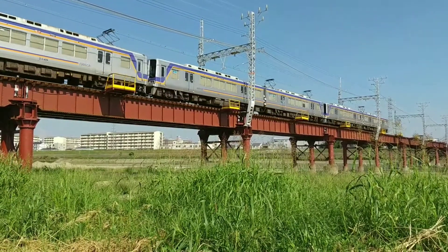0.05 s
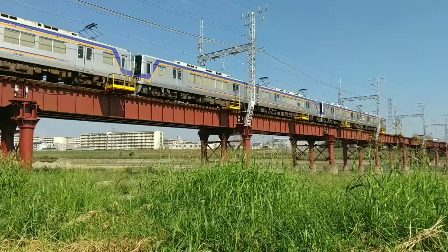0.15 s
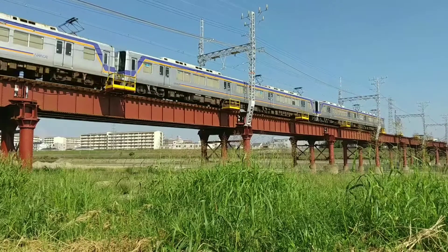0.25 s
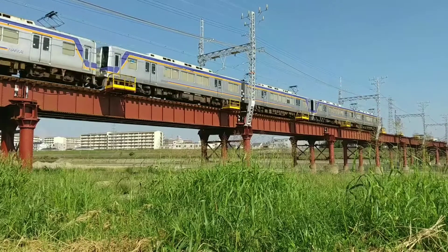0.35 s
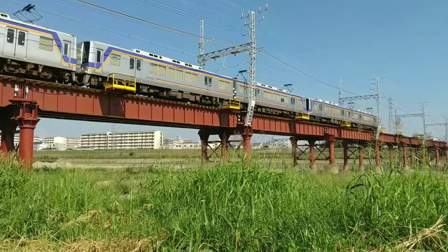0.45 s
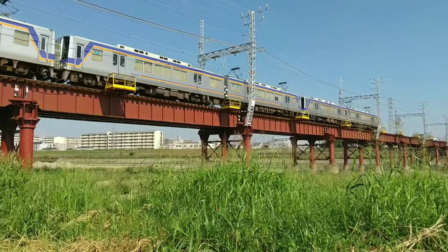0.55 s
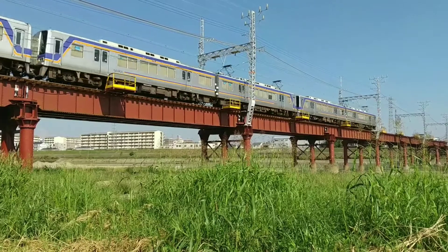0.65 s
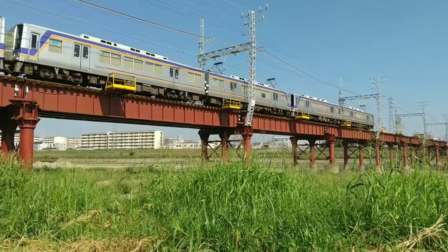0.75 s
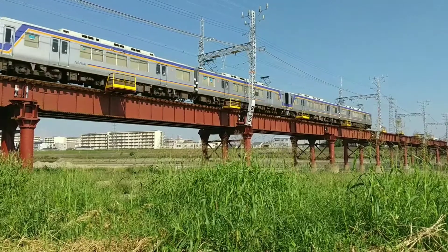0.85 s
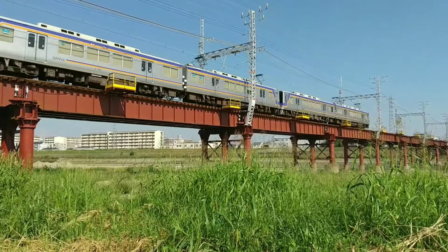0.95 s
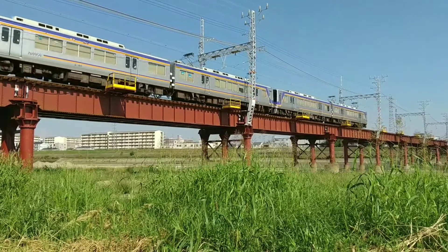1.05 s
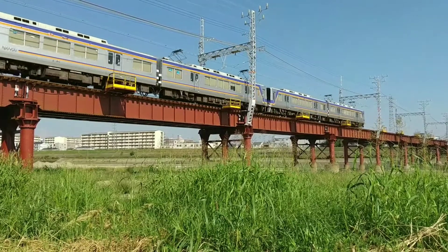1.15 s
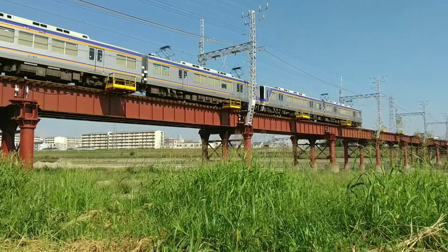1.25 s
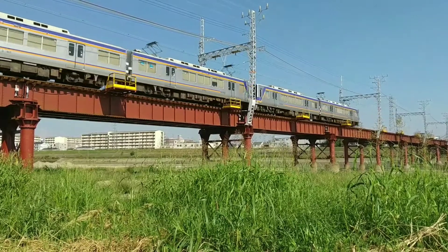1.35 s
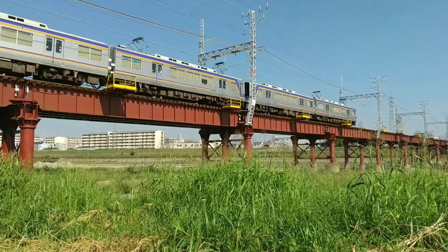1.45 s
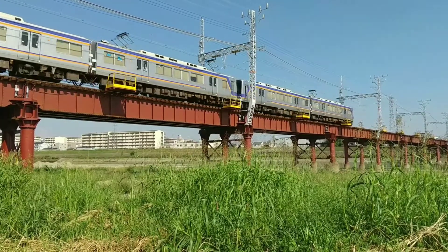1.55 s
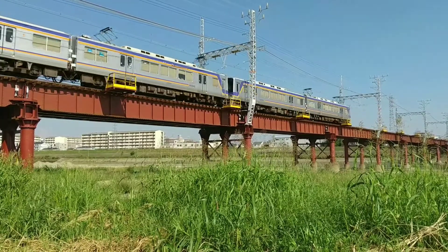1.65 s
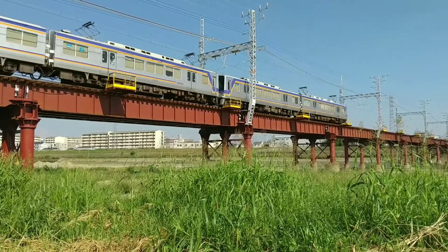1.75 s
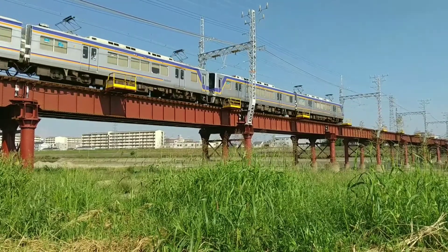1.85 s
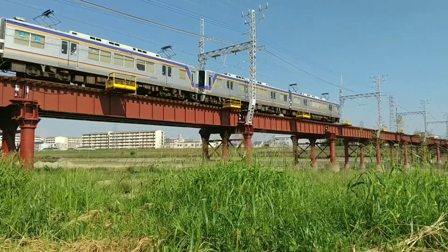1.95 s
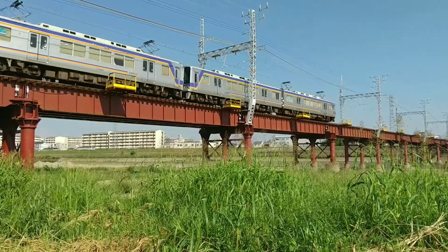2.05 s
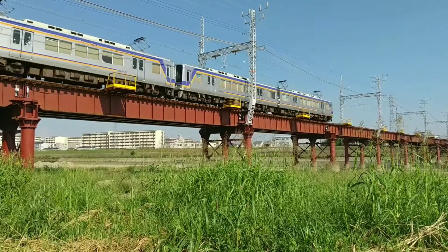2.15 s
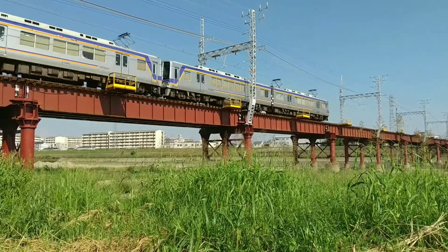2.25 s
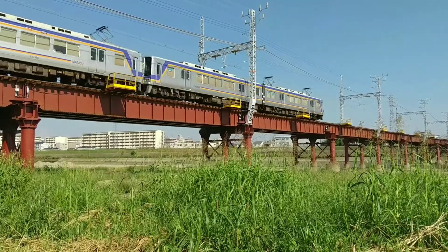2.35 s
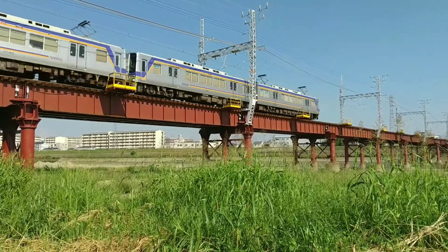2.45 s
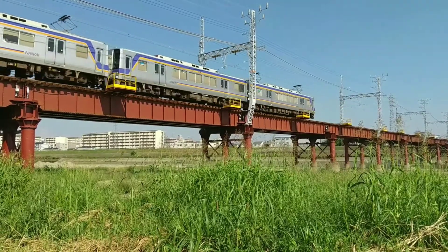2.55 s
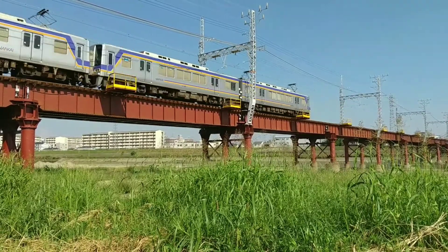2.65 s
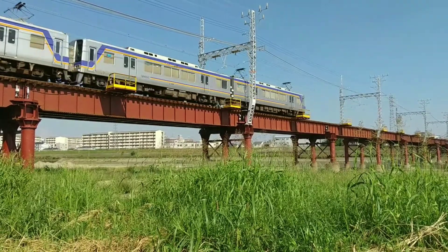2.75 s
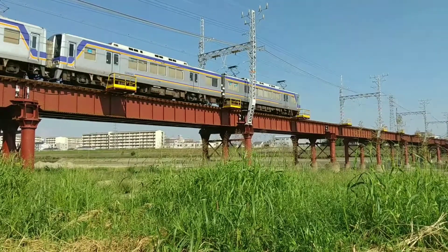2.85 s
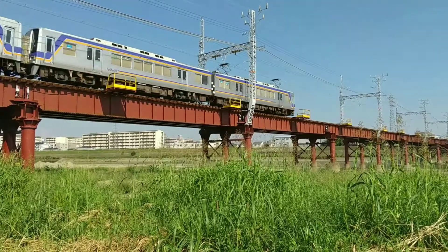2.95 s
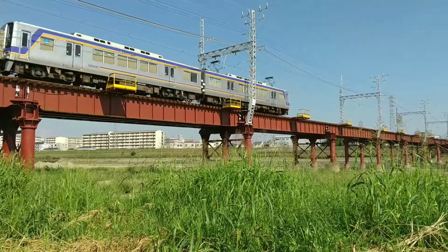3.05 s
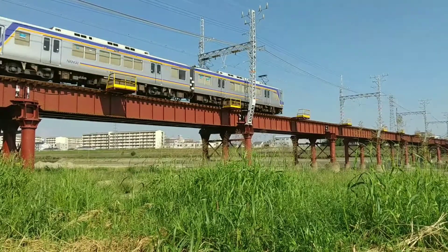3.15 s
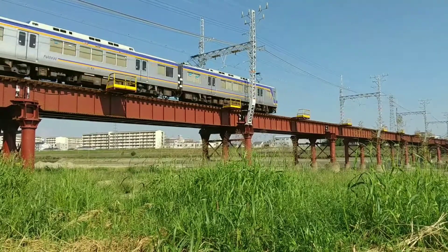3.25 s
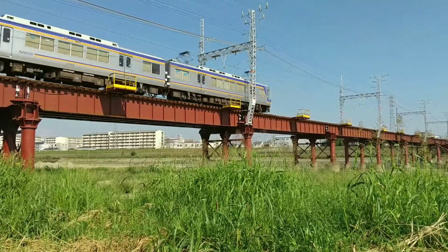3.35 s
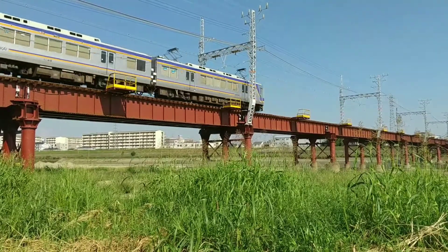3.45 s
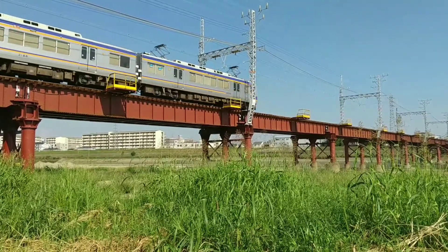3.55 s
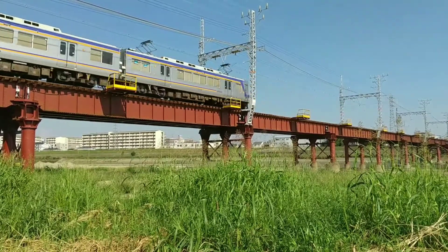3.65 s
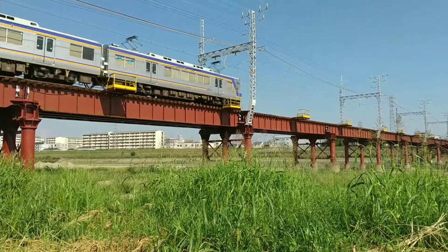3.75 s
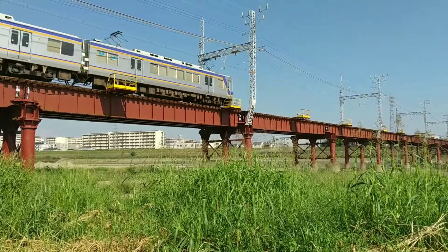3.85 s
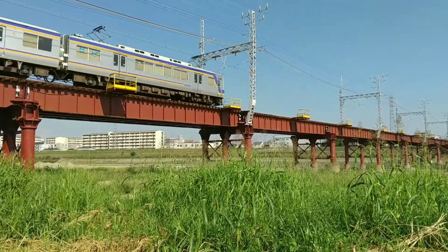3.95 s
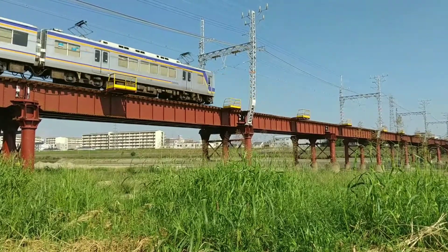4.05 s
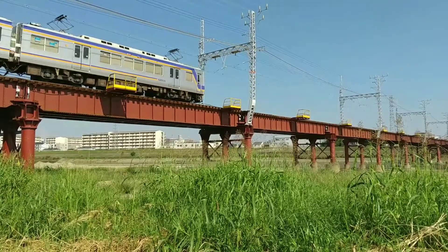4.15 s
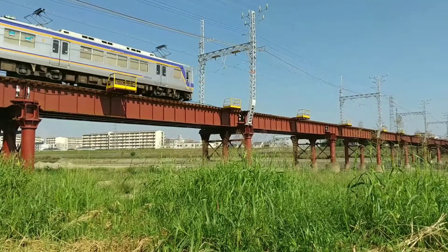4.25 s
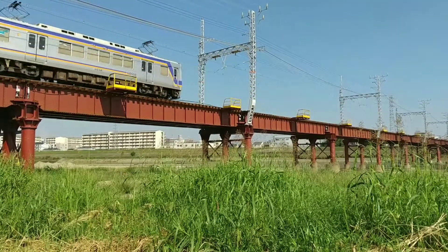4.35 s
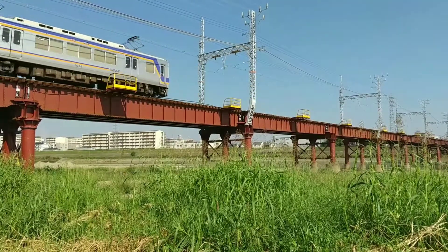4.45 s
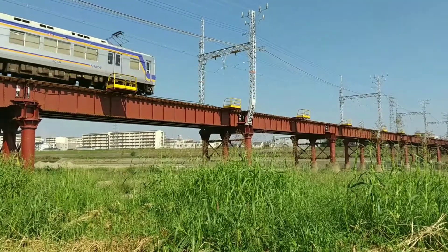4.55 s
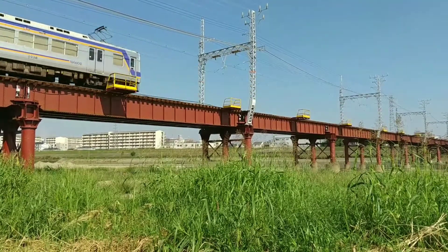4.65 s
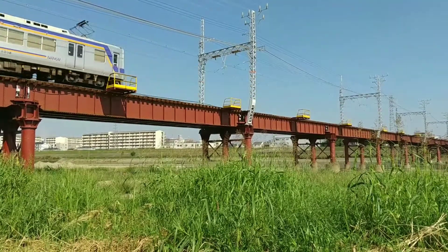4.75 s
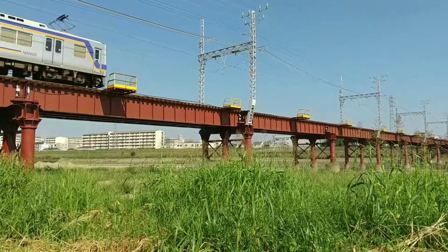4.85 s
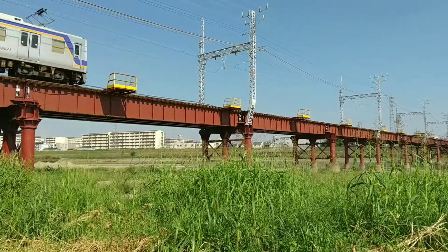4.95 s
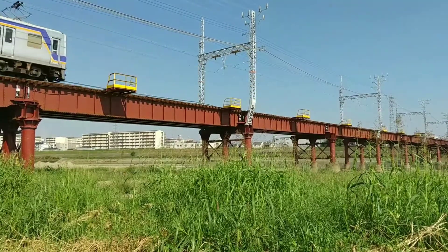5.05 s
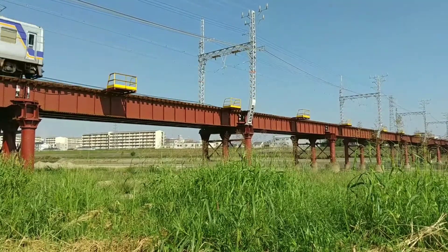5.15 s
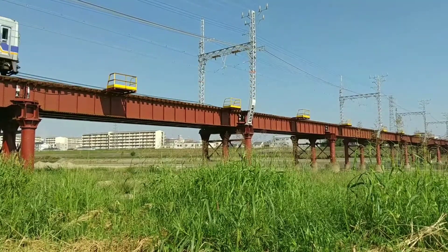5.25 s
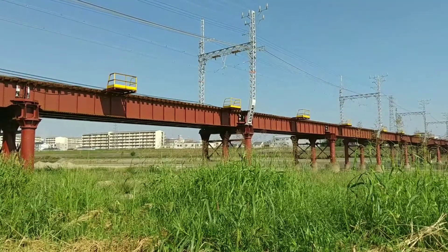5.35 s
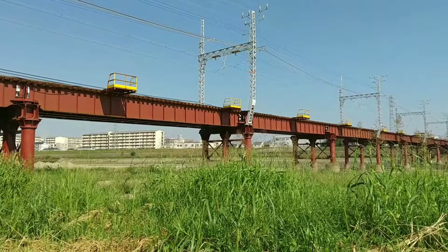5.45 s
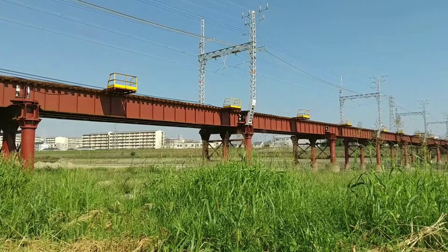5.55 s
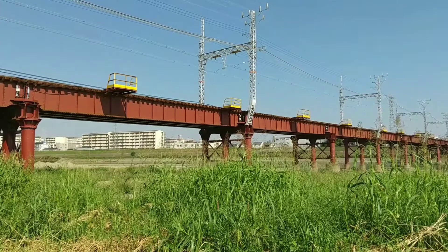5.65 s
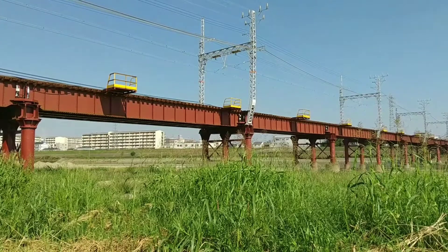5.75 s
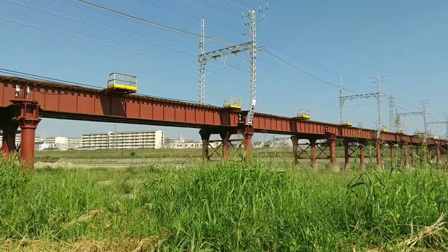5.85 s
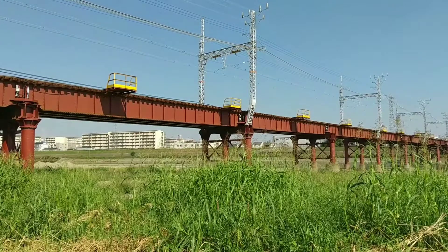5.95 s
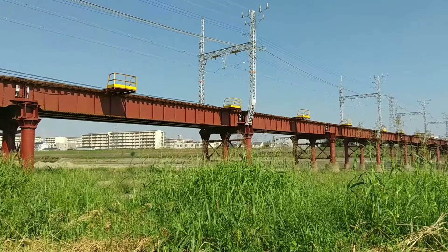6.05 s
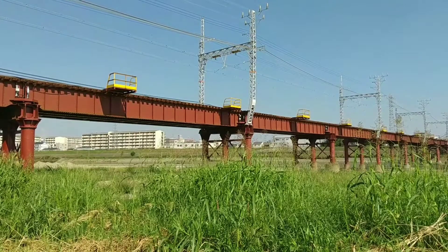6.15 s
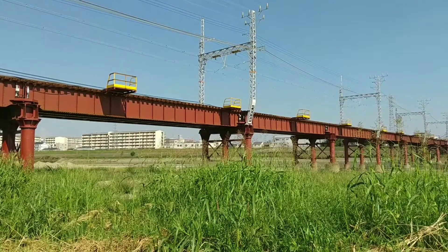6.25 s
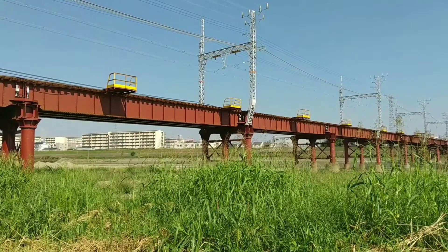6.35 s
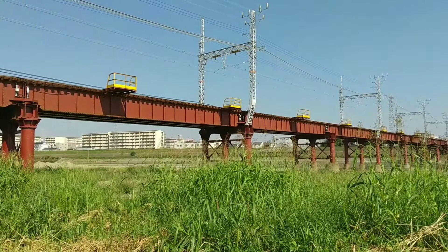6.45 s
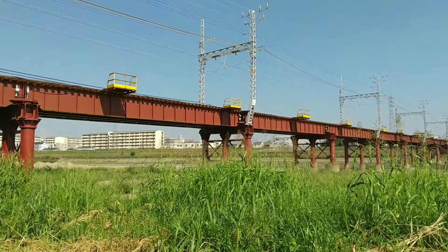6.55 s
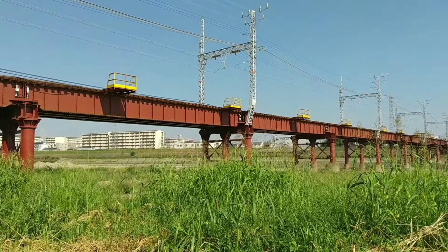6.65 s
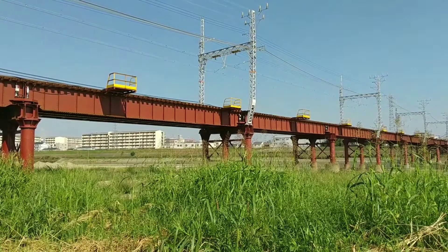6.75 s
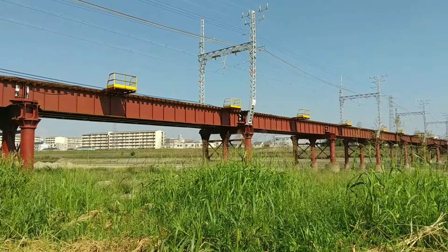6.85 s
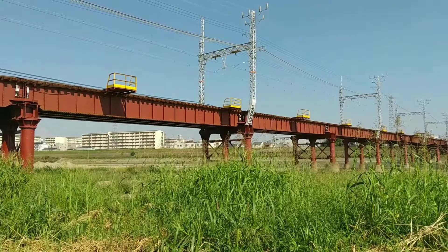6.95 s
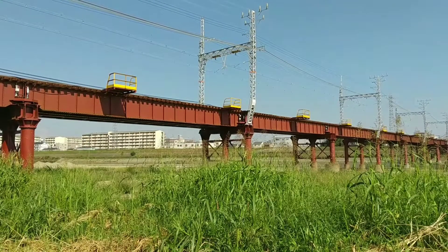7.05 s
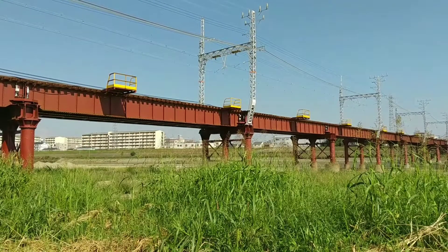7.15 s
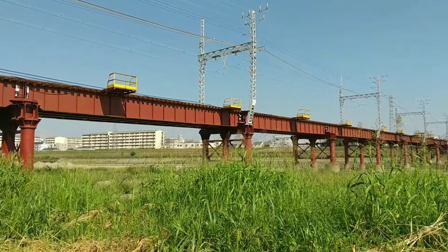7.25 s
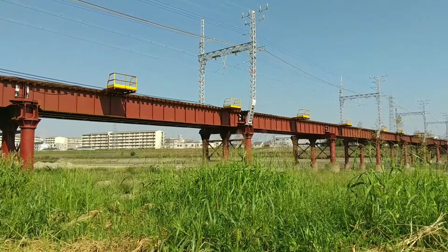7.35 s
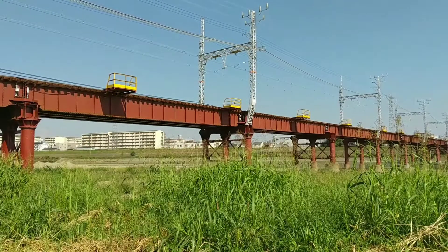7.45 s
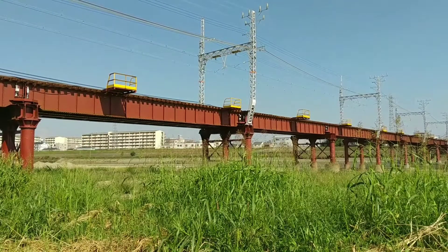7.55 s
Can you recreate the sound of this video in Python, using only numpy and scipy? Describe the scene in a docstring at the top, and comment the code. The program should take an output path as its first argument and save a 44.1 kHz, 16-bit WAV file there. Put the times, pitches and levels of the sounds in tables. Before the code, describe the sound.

Loud metallic train clatter overhead on a steel bridge, hollow roar with paired joint bangs, a few faint high chinks, then a sudden fade.

```python
"""In the grass below an open steel girder bridge, an electric train rolls over a small mono microphone.
The plates roar under the wheels: shaped noise that flickers in patches and thins in colour as it fades.
Axles bang in pairs over two rail joints; each blow is decaying noise plus single ringing panels.
A few high metallic chinks, narrow noise bands, come just before the last bogie meets the near joint;
then the roar drains away along the bridge."""
import sys
import numpy as np
from scipy import signal
from scipy.fft import rfft, irfft, next_fast_len
from scipy.io import wavfile
from scipy.ndimage import uniform_filter1d

SR = 44100
rng = np.random.default_rng(int(sys.argv[2]) if len(sys.argv) > 2 else 0)


def dump_mix(stems):
    """Bounce the given channels to the path in sys.argv[1] as a 16-bit WAV at rate SR."""
    frames = np.atleast_2d(stems).T  # one column per channel
    limited = np.clip(frames, -1, 1)  # hard clip at full scale
    pcm = np.round(limited * 32767).astype(np.int16)
    wavfile.write(sys.argv[1], SR, pcm)


N = 336042
HOP, FRAME = 64, 256  # samples, for noise shaped over time and frequency

# strongest plate modes of the girder web: (f/Hz, width/Hz, lift/dB)
PLATE_MODES = [(135.2, 16, 7), (182.4, 22, 6.5), (348.7, 50, 3.5), (415, 120, 1), (480, 44, 2.5),
               (626, 20, -1), (800, 130, -2.5), (960, 170, 1.5), (1700, 80, 1), (2160, 150, -1)]


def amp(db):
    """Decibels to gain."""
    return 10 ** (np.asarray(db) / 20)


def evened(x):
    """Scales to an rms of one."""
    return x / np.sqrt(np.mean(x ** 2) + 1e-20)


def read(points, hz):
    """Reads a table along log frequency."""
    f, value = np.transpose(points)
    return np.interp(np.log(hz + 1), np.log(f + 1), value)


def bumps(modes, hz):
    """Sum of resonance lifts and dips, in dB."""
    return sum(db / (1 + (2 * (hz - f) / width) ** 2) for f, width, db in modes)


def coloured(x, shape_db):
    """Filters by a dB curve over frequency; white noise keeps its power."""
    size = next_fast_len(N + SR // 4)
    gain = amp(shape_db(np.fft.rfftfreq(size, 1 / SR)))
    gain = gain / np.sqrt(np.mean(gain ** 2))
    return irfft(rfft(x, size) * gain, size)[:N]


def field(size):
    """Noise whose size over frames and frequency is given; size one is white noise of rms one."""
    overlap = FRAME - HOP
    z = signal.stft(rng.standard_normal(N), nperseg=FRAME, noverlap=overlap)[2]
    return signal.istft(z * size[:z.shape[1]].T, nperseg=FRAME, noverlap=overlap)[1][:N]


def struck(age, rise, t60):
    """Power after a blow: it builds as the wave spreads through the steel, then dies away."""
    age = np.maximum(age, 0)
    build_up = (1 - np.exp(-age / max(rise, 1e-3))) ** 2
    return build_up * amp(-120 * age / t60)


def rolling(patchy_db=1.5, flicker_db=0.5, hiss_db=1.5, rumble_db=-0.5, air_loss_db=-3.5):
    """Wheel and rail roughness shakes the plates; with distance the roar takes a thinner colour."""
    # roar of the wheels on the spans: (t/s, level/dB)
    roar_levels = [(0.0, -12), (0.5, -14.5), (1.3, -13), (3.8, -13), (4.4, -15), (5.1, -16), (5.84, -14),
                   (6.15, -18), (6.5, -18.5), (6.7, -20.5), (6.9, -28), (7.13, -33.5), (7.62, -37.5)]
    # colour of the roar close by: (f/Hz, relative level/dB per Hz)
    near_colour = [(15, -55), (25, -48.5), (48, -19.5), (101, -12), (135, -14.5), (209, -11), (453, 0),
                   (605, -8.5), (808, -2), (1130, -15), (1710, -21.5), (1840, -21.5), (2510, -26.5),
                   (3880, -40.5), (8000, -56.5), (10400, -82), (17600, -120)]
    # colour of the roar far along the bridge: (f/Hz, relative level/dB per Hz)
    far_colour = [(15, -45.5), (25, -15), (142, -8.5), (266, -10.5), (339, -2), (382, -9), (475, 1),
                  (751, -8), (1050, -3), (1220, -9), (1370, -15.5), (2340, -19), (4070, -38.5), (7440, -55),
                  (8000, -55), (10400, -84), (17600, -120)]

    roar_db = np.interp(np.arange(N) / SR, *np.transpose(roar_levels))
    far = np.clip((-12 - roar_db) / 21, 0, 1)  # the fainter the roar, the farther the wheels
    shape = (N // HOP + 5, FRAME // 2 + 1)
    hz = np.fft.rfftfreq(FRAME, 1 / SR)

    patches = uniform_filter1d(rng.standard_normal(shape), 40, 0)
    patches = evened(uniform_filter1d(patches, 3, 1))
    # random level flicker shared by all bands
    flicker = evened(uniform_filter1d(rng.standard_normal(shape[0]), 12))[:, None]

    rail_hiss_db = hiss_db * hz ** 2 / (hz ** 2 + 2200 ** 2)
    pier_rumble_db = rumble_db * 220 ** 2 / (hz ** 2 + 220 ** 2)
    # the top treble fades further as the wheels roll away
    gone = np.interp(np.arange(shape[0]) * HOP, np.arange(N), far)[:, None]
    air_db = air_loss_db * np.sqrt(gone) * hz ** 4 / (hz ** 4 + 4200 ** 4)
    lean_db = rail_hiss_db + pier_rumble_db + air_db

    shaking = field(amp(patchy_db * patches + flicker_db * flicker + lean_db))
    near_roar = coloured(shaking, lambda f: read(near_colour, f) + bumps(PLATE_MODES, f))
    far_roar = coloured(shaking, lambda f: read(far_colour, f) + 0.88 * bumps(PLATE_MODES, f))
    return amp(roar_db) * ((1 - far) * near_roar + far * far_roar)


def blows():
    """Every axle meets every joint: rows of (t/s, level/dB, build-up/s, tilt/dB per octave, length, thump/dB)."""
    # bogies, timed as the leading axle meets the near joint:
    # (t/s, leading axle level/dB, trailing axle level/dB)
    bogies = [(-0.0990, -10, -10), (0.6120, -9.5, -8.5), (1.0420, -9.5, -9), (1.7530, -8.5, -8.5),
              (2.193, -9.5, -9.5), (2.9040, -10, -10), (3.3320, -10, -8.4), (4.0420, -8.5, -8.5),
              (4.4850, -9.5, -8.5), (5.191, -9.5, -10.5), (5.6160, -10, -10), (6.3200, -9, -9.5)]
    # rail joints: (met this much earlier at first/s, level/dB, build-up of a leading axle/s,
    # its brightness/dB per octave, ring length factor, thump/dB)
    rail_joints = [(0.0, 0.0, 0.0073, 0.18, 1.076, -1.5), (1.6155, -2.5, 0.012, 1.5, 0.96, 2.2)]
    wheelbase_s = 0.1365  # the trailing axle follows this much later
    gain_per_s = 0.0015  # the train gathers speed, so the run between joints shortens by this share a second
    # on the loaded rail the trailing axle hits quicker and brighter
    trailing_rise, trailing_tilt_db = 0.82, 0.3

    rows = []
    for lead, joint_db, rise, tilt_db, length, thump_db in rail_joints:
        for s, leading_db, trailing_db in bogies:
            at = s - lead * (1 - gain_per_s * s)
            rows.append((at, leading_db + joint_db, rise, tilt_db, length, thump_db))
            rows.append((at + wheelbase_s, trailing_db + joint_db, rise * trailing_rise,
                         tilt_db + trailing_tilt_db, length, thump_db))
    return [row for row in rows if row[0] > 0]


def joints(axles, spread_db=2.0, lead=0.0039, bang_db=1.5, bang_t60=0.12):
    """Each axle blow gives a short bang and wakes the dense girder modes, in a new mix each time."""
    # colour of a blow on the girder: (f/Hz, relative level/dB per Hz)
    clang_colour = [(24, -61), (40, -27.5), (108, -4.5), (177, -11), (359, -3), (611, -3.5), (683, -7.5),
                    (763, -1), (1300, -12.5), (1850, -12), (3150, -24.5), (4600, -37), (8000, -47),
                    (10400, -73), (17600, -120)]
    # ring of the struck girder, before each joint's length factor: (f/Hz, t60/s)
    ring_times = [(100, 0.65), (400, 0.9), (1000, 0.33), (2500, 0.61), (6000, 0.58)]

    t = np.arange(N // HOP + 5) * HOP / SR
    hz = np.fft.rfftfreq(FRAME, 1 / SR)
    power = np.zeros((len(t), len(hz)))
    mixes = uniform_filter1d(rng.standard_normal((len(axles), len(hz))), 2, 1)
    for (s, db, rise, tilt_db, length, thump_db), mix in zip(axles, mixes):
        span = slice(max(int((s - lead) * SR / HOP), 0), int((s + 1) * SR / HOP))
        age = t[span, None] - s + lead  # each blow begins slightly before its listed time
        colour_db = db + tilt_db * np.log2((hz + 100) / 2500) + spread_db * mix
        # the axle load drops onto the cross beams
        colour_db += thump_db * 350 ** 2 / (hz ** 2 + 350 ** 2)
        bang = amp(2 * bang_db) * struck(age, rise / 2, bang_t60 * length)
        ring = struck(age, rise, length * read(ring_times, hz))
        power[span] += amp(2 * colour_db) * (bang + ring)
    return coloured(field(np.sqrt(power)), lambda f: read(clang_colour, f) + bumps(PLATE_MODES, f))


def web(axles, level_db=-15.5, spread_db=4.0, detune=0.052):
    """Single panels of the girder web ring as decaying sines; each blow rings them in a new random mix."""
    # clearest rings of a blow, before random detuning and spread and the joint's length factor:
    # (f/Hz, level/dB, t60/s)
    panels = [(809, 1.5, 0.21), (932, 1, 0.34), (1230, -3.5, 0.18), (1460, -4.5, 0.42), (1790, -10, 0.17),
              (1890, -5, 0.14), (2074, 0, 0.23), (2344, -3, .2), (2446, -9.5, 0.18), (2890, -11, 0.12),
              (3260, -11.5, 0.11), (3700, -15, 0.09)]

    out = np.zeros(N + SR)
    age = np.arange(SR // 3) / SR
    hz, mode_db, t60 = np.transpose(panels)[:, :, None]
    t60 = np.clip(t60, .08, .35)
    chance = rng.standard_normal((len(axles), 3, len(panels), 1))
    for (s, db, rise, _, length, _), (size, pitch, start) in zip(axles, chance):
        fade = np.sqrt(struck(age, rise, length * t60))
        tones = np.sin(2 * np.pi * (hz * (1 + detune * pitch) * age + start))
        rings = amp(mode_db + spread_db * size) * fade * tones
        out[round(s * SR):][:len(age)] += amp(db + level_db) * rings.sum(0)
    return out[:N]


def chinks():
    """Short bright rings: noise in narrow high bands that builds quickly and dies away."""
    # high chinks: (t/s, level/dB, build-up/s, t60/s, lean to the top/dB per kHz above 7 kHz)
    strokes = [(5.829, -48.5, .03, 0.45, 1), (5.875, -47, .02, 0.24, -1), (5.915, -49, .015, 0.23, -5),
               (6.092, -49.5, 0.0051, 0.34, 5), (6.249, -47, 0.0043, 0.37, -2)]
    # bands they ring with: (f/Hz, width/Hz, level/dB)
    ring_bands = [(5800, 300, -7), (6550, 520, 5), (7000, 500, -7), (7620, 500, -0.5)]

    t = np.arange(N) / SR
    out = np.zeros(N)
    for hz, width, ring_db in ring_bands:
        power = np.zeros(N)
        for s, db, rise, t60, lean_db in strokes:
            stroke_db = db + lean_db * (hz - 7000) / 1000
            power += amp(2 * stroke_db) * struck(t - s, rise, t60)
        noise = rng.standard_normal(N)
        band = coloured(noise, lambda f: -20 * np.log10(1 + (2 * (f - hz) / width) ** 2))
        out += amp(ring_db) * np.sqrt(power) * band
    return out


def scene():
    """All sources at the one microphone."""
    axles = blows()
    return (rolling() + joints(axles) + web(axles) + chinks())[None]


def record(dry):
    """Microphone colour and bass cut, a soft overload towards full scale, then the band limit."""
    # lifts and dips of the sound at the microphone, with a low lift near 46 Hz: (f/Hz, width/Hz, lift/dB)
    heard_bumps = [(46, 8.4, 2), (62, 10, 4), (74, 8, -7), (1110, 140, 0.5), (1290, 600, -1),
                   (2430, 240, 1.5), (2880, 480, -1.5), (3730, 580, 3.5), (4166, 80, 6), (7680, 860, 10),
                   (8016, 250, -15.5)]
    # narrow dips of the recorder case: (f/Hz, width/Hz, lift/dB)
    case_dips = [(3985, 150, -10), (6030, 180, -6)]
    knee, edge_hz = .8, 8280  # overload starts at this level; top of the band

    size = next_fast_len(N + SR // 4)
    colour_db = bumps(heard_bumps + case_dips, np.fft.rfftfreq(size, 1 / SR))
    heard = irfft(rfft(dry, size) * amp(colour_db), size)[:, :N]
    # small capsule, no deep bass
    heard = signal.sosfilt(signal.butter(8, 38.5, "high", fs=SR, output="sos"), heard)

    over = np.maximum(abs(heard) - knee, 0)
    squeezed = (1 - knee) * np.tanh(over / (1 - knee))
    held = heard - np.sign(heard) * (over - squeezed)

    band_limit = signal.firwin(383, edge_hz, window=("kaiser", 9), fs=SR)
    return signal.oaconvolve(held, band_limit[None], "same")


dry = scene()
out = record(dry)
dump_mix(out)
```